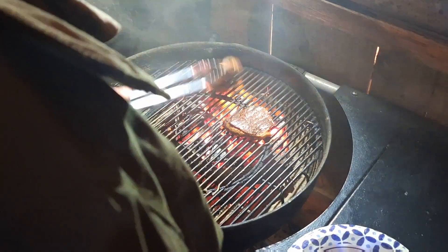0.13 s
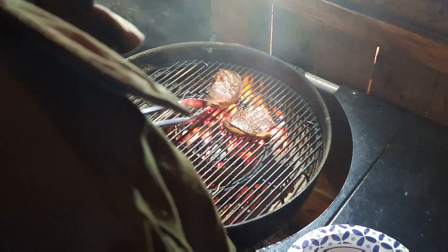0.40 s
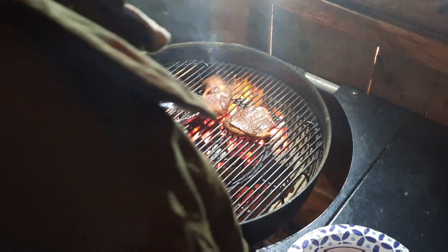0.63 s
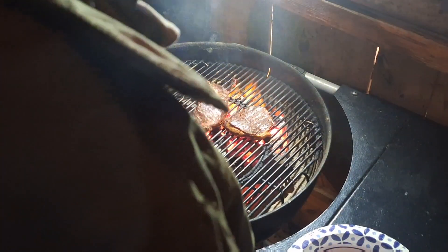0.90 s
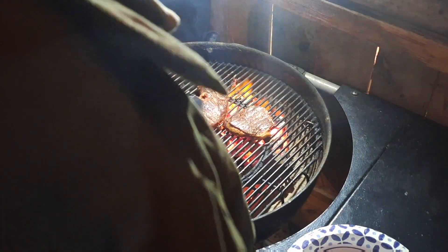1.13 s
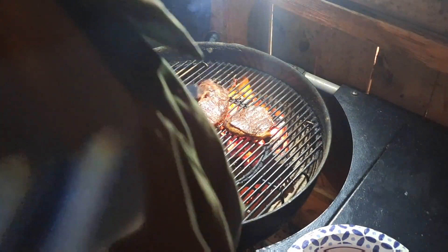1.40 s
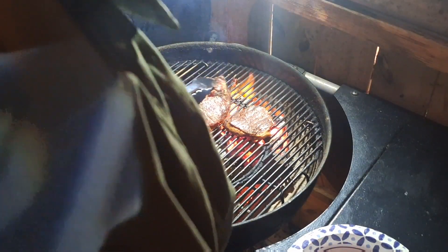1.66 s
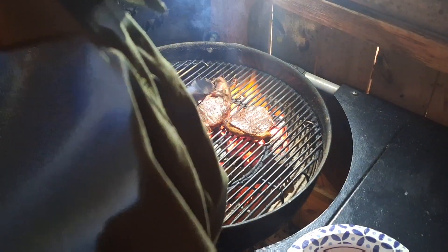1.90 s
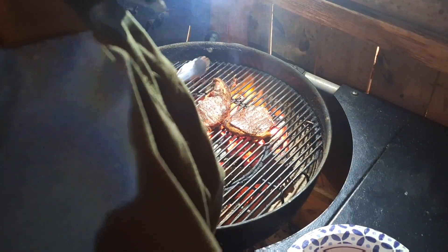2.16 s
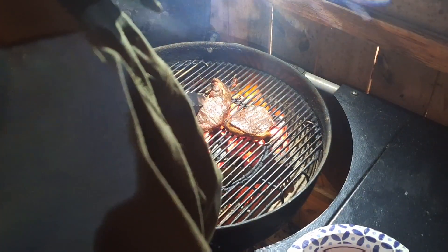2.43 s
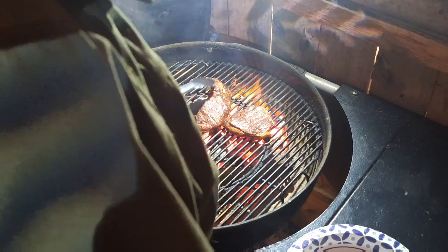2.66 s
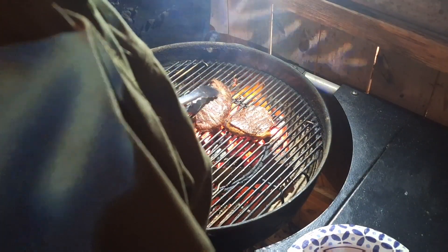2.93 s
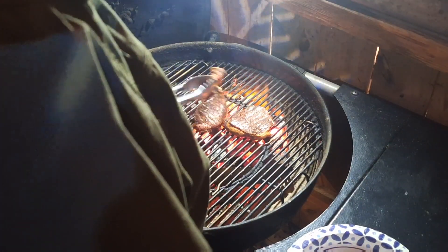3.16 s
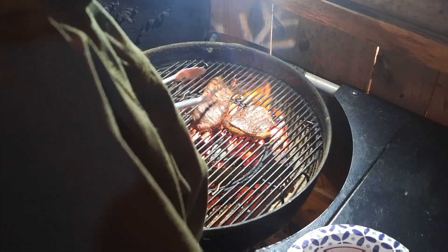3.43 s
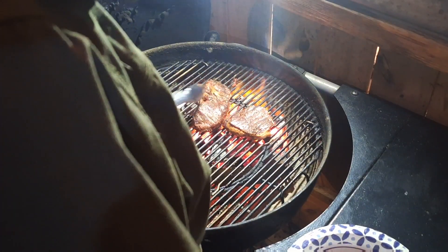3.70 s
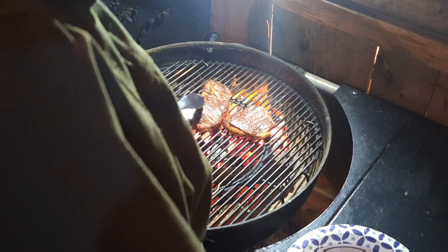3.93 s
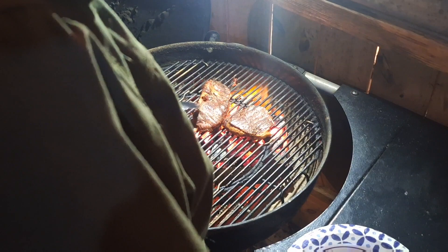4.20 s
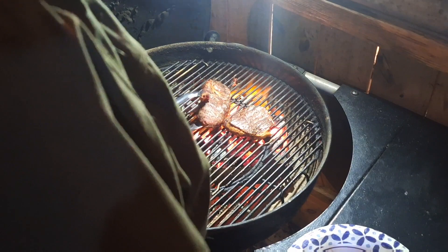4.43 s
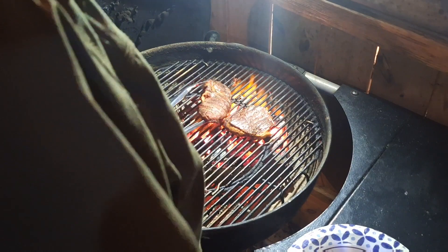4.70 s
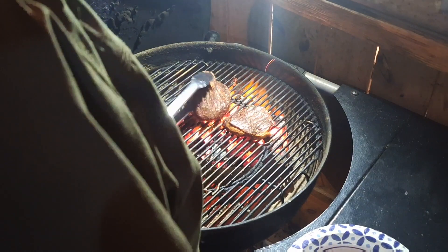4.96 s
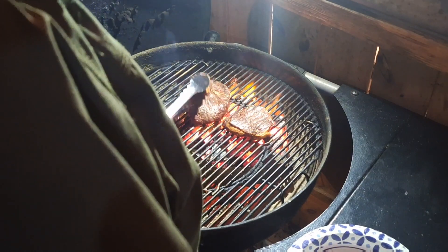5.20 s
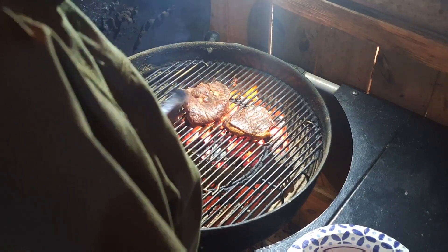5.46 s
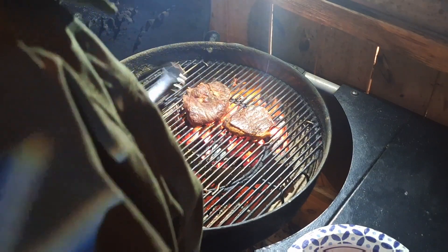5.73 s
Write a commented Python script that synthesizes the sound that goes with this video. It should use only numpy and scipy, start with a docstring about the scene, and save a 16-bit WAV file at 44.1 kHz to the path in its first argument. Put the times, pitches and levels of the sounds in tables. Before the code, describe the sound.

A wet, uneven sizzle crackles close by, its treble leaning right, broken by loud spitting pops. Tongs tap and rattle on the steel grate with short, dry ringing, and meat lands in dull thuds. Underneath, a low engine hum wavers on the left with soft rumble. The loudest snaps momentarily duck everything in the stereo pickup.

```python
"""Steaks sizzle, spit and pop on a charcoal kettle grill close to a stereo camera, brightest on the right.
Steel tongs tap and scrape the grate between wooden walls: rattling contacts ring damped steel modes.
Some way off to the left an engine idles: wavering tones make the hum and shaped noise the low rumble.
Sizzle is thousands of random bubble clicks a second; the big pops add scattered spray.
The camera's limiter ducks everything for a moment after peaks over its limit."""
import sys
import numpy as np
from scipy import signal
from scipy.fft import rfft, irfft
from scipy.io import wavfile
from scipy.ndimage import uniform_filter1d

SR = 44100
rng = np.random.default_rng(int(sys.argv[2]) if len(sys.argv) > 2 else 0)


def store_pcm(level_fs):
    """Save levels as 16-bit WAV."""
    pcm = np.round(np.clip(level_fs, -1, 1) * 32767).astype(np.int16)
    wavfile.write(sys.argv[1], SR, np.atleast_2d(pcm).T)


def decibels_to_gain(level_db):
    """Convert a level in decibels to a linear amplitude gain (20 dB per decade)."""
    exponent = np.asarray(level_db, float) / 20
    return 10 ** exponent


N = 257544

# Low wash of engine and draught. Each row: frequency in Hz, relative density in dB per Hz.
RUMBLE_SPECTRUM = [(12, -37), (20, -24), (54, 3), (123, -6), (148, -15), (177, -9), (352, -17.5),
                   (874, -36), (1510, -42), (1640, -42.5), (2500, -36.5), (3250, -108), (5500, -120)]
# Likeness of the wash at the two microphones. Each row: frequency in Hz, left-right correlation.
RUMBLE_LIKENESS = [(60, 0.96), (130, 1), (290, 0.84), (640, 0.51), (1410, 0.21), (3100, 0.96), (6820, 0.02),
                   (15000, -0.01)]
RUMBLE_RMS_DB = -30

# Slow uneven level of the low hum, from chance beating of its close lines.
# Each row: time in seconds, level in dB.
HUM_LEVEL = [(0.0, -20), (0.5, -26), (1.4, -22.5), (2.0, -26.5), (2.6, -21.5), (3.4, -23.5), (4.0, -28),
             (4.6, -24.5), (5.3, -22), (5.84, -24.5)]
# Drift of the engine's pitch. Each row: time in seconds, frequency of the hum's second-order line in Hz.
ENGINE_PITCH = [(0.0, 131.6), (0.11, 127.4), (0.81, 127.0), (1.79, 128.8), (2.42, 125.8), (3.14, 125.9),
                (4.16, 130), (5.07, 126), (5.84, 125.8)]
# Lines of the hum. Each row: multiple of half the second-order line, relative level in dB.
HUM_LINES = [(.8, -14), (1, -5), (1.2, -10.5), (1.4, -15), (1.6, -19), (1.799, -9), (2, -1.5), (2.9, -33.5)]
UPPER_HUM_DB = -27.5  # steady level of the lines above the low hum

# Ringing modes of tongs and grate. Each row: frequency in Hz, relative level in dB.
STEEL_MODES = [(210, 0), (260, -3), (370, -4), (500, 7), (590, 20), (740, 22), (860, 19), (1150, 18.5),
               (1340, 1), (1700, 6), (1860, 30), (2210, 20), (2285, 17), (2800, -7), (3150, -10),
               (3400, -1), (3770, 22.5), (4190, -3), (5030, 21.5), (5280, 20), (5750, 16), (6400, -16),
               (6810, -7), (7250, 30.5)]
RING_T60_S = .038  # at 1 kHz, falling with the root of pitch: meat and hand damp the steel
# Tongs clacking broadly on the grate.
# Each row: start in seconds, peak in dB, centre in Hz, spread in octaves, rattle decay in seconds.
CLACKS = [(0.0502, -18.5, 3040, 1.23, 0.0097), (0.832, -10.5, 4460, .55, 0.0055),
          (0.9557, -16, 3500, 1.05, 0.024), (0.992, -15.5, 3420, 0.96, 0.015),
          (1.444, -24.5, 2080, 1.06, 0.071), (1.9857, -15, 3500, 0.73, 0.0052),
          (1.9957, -15, 3500, 0.44, 0.0079), (1.5524, -19.5, 4040, 0.25, .003),
          (2.4029, -21, 3600, .52, .008), (3.8606, -9, 5500, 0.37, 0.017), (4.124, -24.5, 2060, 1.1, 0.028),
          (4.129, -18.5, 4960, 0.44, .009), (5.466, -14, 3050, 0.96, .007), (5.489, -24, 3600, 0.63, 0.018),
          (5.515, -14, 2930, 0.58, 0.013), (5.5408, -8.5, 2820, 1.08, .014),
          (5.5574, -10, 6000, 0.64, 0.011), (5.574, -31, 3600, 1.06, 0.012)]
# Light touches that ring few modes.
# Each row: start in seconds, peak in dB, centre in Hz, spread in octaves, rattle decay in seconds.
PINGS = [(0.0644, -38, 1430, 0.09, 0.016), (0.974, -35, 1270, 0.16, .015), (2.357, -28, 3800, 0.22, 0.0093),
         (3.471, -26.5, 2800, 0.14, 0.006), (3.5049, -34, 1690, .1, 0.0076),
         (3.558, -21, 3970, 0.28, 0.0031), (3.868, -23, 2290, .03, 0.034), (4.8774, -35, 2130, 0.11, .012)]
# Dull knocks of tongs and meat on the grate.
# Each row: start in seconds, peak in dB, centre in Hz, rattle decay in seconds.
THUDS = [(0.017, -32, 410, 0.031), (0.558, -29, 230, 0.045), (0.897, -31, 420, .03),
         (1.445, -29, 520, 0.045), (1.483, -26, 231, 0.084), (1.984, -25, 930, 0.0059),
         (1.995, -25, 986, 0.005), (2.644, -42.5, 700, 0.064), (3.502, -28, 463, 0.037),
         (3.508, -25, 217, 0.032), (3.865, -31, 895, 0.048), (4.143, -39, 601, 0.052),
         (4.881, -33.5, 503, 0.056), (5.508, -29.5, 700, 0.064)]
THUD_OCTAVES = .35
CLACK_CRACK_DB, PING_CRACK_DB, THUD_CRACK_DB = 7, -1, 6  # unpitched contact noise against the ringing
TONGS_LEFT_DB, MEAT_LEFT_DB = -1.5, 1.5  # left minus right

# Frying fat.
# Each row: time in seconds, level above 9 kHz in dB, gain of the wet sputter below SPUTTER_HZ in dB.
SIZZLE = [(0.0, -23.5, 9.5), (0.11, -33, 1), (0.32, -27.5, -4), (0.62, -27.5, 0), (0.75, -24, -0.5),
          (1.04, -28, 1), (1.52, -25.5, 3.5), (1.9, -25.5, 3.5), (2.21, -31, -0.5), (2.52, -26.5, 4),
          (2.91, -26, 0), (3.21, -28, 7), (3.42, -24.5, 3), (3.62, -29.5, -0.5), (4.0, -32.5, 5),
          (4.15, -28.5, 3), (4.37, -33.5, 3), (4.5, -28.5, 7), (4.8, -30.5, -1.5), (4.88, -26.5, 2),
          (5.13, -31.5, -3), (5.21, -26, -.5), (5.54, -24, 2.5), (5.84, -28, 3.5)]
# Bursting bubbles as the microphones colour them. Each row: frequency in Hz, relative density in dB per Hz.
FIZZ_COLOUR = [(350, -44), (600, -18), (739, -23.5), (860, -28), (1020, -25), (1180, -24.5), (2240, -14.5),
               (5010, -7.5), (5670, -8), (7380, -2), (9220, -10), (11800, -2), (14800, 1), (15800, 7),
               (16500, -67)]
# Lean of the grill between the microphones. Each row: frequency in Hz, left minus right in dB.
GRILL_LEAN = [(60, 0), (130, 2), (500, 3), (1500, 0.5), (2600, -1.7), (3600, -7.5), (4200, -1.5),
              (7600, 0.7), (8700, -4), (10300, -10.5), (12400, -11), (14400, -12), (16000, -7.5)]
# Big drops of fat exploding.
# Each row: start in seconds, nominal peak in dB, gain of the low body in dB, t60 of the spray in seconds.
BIG_POPS = [(0.0512, -13, -7, .04), (0.1356, -5.5, -6, .058), (0.9542, -0.5, -1, .025),
            (1.9197, -8, 1, .02), (2.0604, -5, -2, 0.021), (2.166, -8, -5, .038), (2.237, -10.5, -11, .03),
            (2.3, -13, 3, .03), (2.4146, -4, 0, 0.034), (3.1826, -1.5, -5, 0.0065),
            (3.2975, -7.5, 7, 0.031), (3.8606, 1.5, -19, .086), (4.0741, -8, -2, .03),
            (4.1914, -13, 1, .03), (4.3116, -11, -4, 0.014), (4.4555, -7, 2, 0.038),
            (4.6149, -6.5, 4, 0.021), (5.2104, -7, 5, .03), (5.4664, -5.5, -4, 0.05),
            (5.5418, -2, -2, 0.059), (5.6504, -10.5, 7, .035), (5.784, -5.5, -4, 0.039)]
SPUTTER_HZ = 3500  # sputter and pop body are turned up or down below this
BUBBLES_PER_S, SIZE_SPREAD_DB = 9000, 2
# Small dry pops at random times: each is louder than the least by up to the spread.
SMALL_POPS, SMALL_POP_DB, SMALL_SPREAD_DB = 40, -15, 7
SMALL_BODY_DB, SMALL_SPRAY_T60_S = -4, .015

LIMIT_DB, RECOVERY_DB_PER_S, ATTACK_S = -1.5, 74, 0.0046
CEILING_DB = -2.5
EDGE_HZ = 15900


def evened(x):
    """Scales to rms 1."""
    return x / np.sqrt(np.mean(x ** 2) + 1e-20)


def read(points, hz):
    """Reads a spectrum on a log-frequency axis."""
    f, value = np.transpose(points)
    return np.interp(np.log(hz + 1), np.log(f + 1), value)


def curves(rows):
    """Each column of a table after the time as one value per sample."""
    s, *columns = np.transpose(rows)
    return [np.interp(np.arange(N) / SR, s, c) for c in columns]


def sides(hz):
    """Left and right microphone gains that make the grill's lean between the channels."""
    return decibels_to_gain(np.outer([.5, -.5], read(GRILL_LEAN, hz)))


def causal(gain):
    """Minimum-phase impulse response for a gain curve."""
    mirrored = np.concatenate([gain, gain[..., -2:0:-1]], -1)
    log_gain = np.log(mirrored + 1e-5)
    response = np.fft.ifft(np.exp(np.conj(signal.hilbert(log_gain)))).real
    return response[..., :1024]


def add(mix, s, sound):
    """Mixes a two-channel sound in at time s."""
    part = mix[:, round(s * SR):][:, :sound.shape[1]]
    part += sound[:, :part.shape[1]]


def rumble():
    """Low wash of the engine and the fire's draught: patchy noise, most alike at both microphones in the bass."""
    frames, hz = N // 512 + 5, np.fft.rfftfreq(2048, 1 / SR)
    a, b, c, d, patches = rng.standard_normal((frames, 1025, 5)).T
    patches = evened(uniform_filter1d(uniform_filter1d(patches, 12, 0), 6, 1))
    same = np.clip(read(RUMBLE_LIKENESS, hz), -1, 1)[:, None]
    left, unrelated = a + 1j * b, c + 1j * d
    right = same * left + np.sqrt(1 - same ** 2) * unrelated
    shape = decibels_to_gain(read(RUMBLE_SPECTRUM, hz)[:, None] + 1.18 * patches)
    spectra = np.array([left, right]) * shape * sides(hz)[..., None]
    wash = signal.istft(spectra, nperseg=2048, noverlap=1536)[1][:, :N]
    return decibels_to_gain(RUMBLE_RMS_DB) * evened(wash)


def engine():
    """Uneven firing gives wavering lines on a comb of shaft orders; the low hum's level is slowly uneven."""
    (low_db,), (line_hz,) = curves(HUM_LEVEL), curves(ENGINE_PITCH)
    turns = np.cumsum(line_hz / 2) / SR
    hum = 0
    for order, db in HUM_LINES:
        level_db = low_db if order < 1.7 else UPPER_HUM_DB
        depth = .25 if order % 1 == 0 else .8  # whole orders are steadier
        waver = 1 + depth * evened(uniform_filter1d(rng.standard_normal(N), 4000))
        tone = np.sqrt(2) * np.cos(2 * np.pi * (order * turns + rng.random()))
        hum = hum + decibels_to_gain(db + level_db) * waver * tone
    later = np.roll(hum, 25)
    return np.array([hum, later]) * decibels_to_gain([[1.2], [-1.2]])  # louder and sooner on the left


def blows():
    """Every contact with the steel as time, level, centre, spread, rattle, contact noise and side."""
    return ([(*row, CLACK_CRACK_DB, TONGS_LEFT_DB) for row in CLACKS]
            + [(*row, PING_CRACK_DB, TONGS_LEFT_DB) for row in PINGS]
            + [(s, db, hz, THUD_OCTAVES, rattle, THUD_CRACK_DB, MEAT_LEFT_DB) for s, db, hz, rattle in THUDS])


def tongs():
    """Each blow is a dying rattle of contacts; its centre and spread pick the steel modes that ring."""
    out, t, hz = np.zeros((2, N)), np.arange(16384) / SR, np.fft.rfftfreq(16384, 1 / SR)
    modes_hz, modes_db = np.transpose(STEEL_MODES)[..., None]
    decay_db = 60 * t * np.sqrt(modes_hz / 1000) / RING_T60_S
    rings = decibels_to_gain(modes_db - decay_db) * np.sin(2 * np.pi * modes_hz * t)
    walls = decibels_to_gain(-24.0 - 60 * t / 0.13) * (t > .004)  # the wooden corner answers each blow
    for s, db, centre_hz, octaves, rattle_s, crack_db, left_db in blows():

        def near(f):
            """Bell curve around the blow's centre on an octave scale."""
            return np.exp(-.5 * (np.log2((f + 1) / centre_hz) / max(octaves, .03)) ** 2)

        struck = rng.random(len(t)) < .06
        contacts = rng.standard_normal(len(t)) * struck * np.exp(-t / abs(rattle_s))
        contacts[0] = 0.87
        # each microphone hears each mode differently
        shapes = near(modes_hz.T) * decibels_to_gain(2.0 * rng.standard_normal((2, len(STEEL_MODES))))
        crack = causal(near(hz) * np.sqrt(centre_hz / (hz + centre_hz / 4)))
        crack = np.pad(crack, (0, len(t) - 1024))
        steel = evened(shapes @ rings) + decibels_to_gain(crack_db) * evened(crack)
        echo = walls * rng.standard_normal((2, len(t)))
        blow = irfft(rfft(contacts) * rfft(steel) * (1 + rfft(echo)))[:, :12000]
        pan_db = np.array([[.5], [-.5]]) * left_db
        add(out, s, blow / abs(blow.mean(0)).max() * decibels_to_gain(db + pan_db))
    return out


def bowl(echo_db, t60s):
    """For each spot on the grate: its own arrival time at each microphone, then a short dying scatter."""
    t, count = np.arange(3000) / SR, len(t60s)
    fade = decibels_to_gain(echo_db - 60 * t / np.abs(t60s)[:, None, None])
    paths = fade * rng.standard_normal((count, 2, len(t)))
    paths[..., :60] = 0
    arrivals = rng.integers(40, 48, (count, 2)) + [0, 2]
    paths[np.arange(count)[:, None], [0, 1], arrivals] = 1
    return paths


def pops():
    """The large pops and a random scatter of small dry ones, as columns of time, size, body and spray t60."""
    when, size = rng.random((SMALL_POPS, 2)).T
    alike = np.ones(SMALL_POPS)
    small_db = SMALL_POP_DB + SMALL_SPREAD_DB * size
    small = [when * N / SR, small_db, SMALL_BODY_DB * alike, SMALL_SPRAY_T60_S * alike]
    return np.vstack([BIG_POPS, np.transpose(small)]).T


def fat():
    """Steam bubbles burst all over the meat, a few much larger; the big pops spray droplets after them."""
    level_db, sputter_db = curves(SIZZLE)
    hz = np.fft.rfftfreq(4096, 1 / SR)
    colour = causal(decibels_to_gain(read(FIZZ_COLOUR, hz)) * sides(hz))
    flurries_db = 1.0 * evened(uniform_filter1d(rng.standard_normal(N), 500))
    size = decibels_to_gain(SIZE_SPREAD_DB * np.minimum(rng.exponential(1, N), 6) + flurries_db)
    bursts = size * rng.choice([-1., 1.], N) * (rng.random(N) < BUBBLES_PER_S / SR)
    spot = rng.integers(0, 10, N)  # which of ten spots on the grate each bubble bursts at
    fizz = np.zeros((2, N))
    for k, path in enumerate(bowl(echo_db=-16.0, t60s=np.full(10, .04))):
        fizz += signal.oaconvolve((bursts * (spot == k))[None], path, axes=1)[:, :N]
    # level is set on the coloured treble of both microphones together
    top = signal.butter(6, 9000, "high", fs=SR, output="sos")
    fizz /= signal.sosfilt(top, signal.oaconvolve(fizz, colour, axes=1).mean(0)).std()
    low = signal.butter(2, SPUTTER_HZ, fs=SR, output="sos")
    fizz = decibels_to_gain(level_db) * (fizz + (decibels_to_gain(sputter_db) - 1) * signal.sosfilt(low, fizz))
    *rows, sprays = pops()
    paths = bowl(echo_db=-20, t60s=sprays) / abs(colour.mean(0)).max()
    for s, db, body_db, path in zip(*rows, paths):
        body = (decibels_to_gain(body_db) - 1) * signal.sosfilt(low, path)
        add(fizz, s, decibels_to_gain(db) * (path + body))
    return signal.oaconvolve(fizz, colour, axes=1)[:, :N]


def scene():
    """All sources at the two microphones."""
    return rumble() + engine() + tongs() + fat()


def low_pass(x):
    """Removes everything above the highest recorded frequency."""
    return signal.sosfilt(signal.butter(12, 17040, fs=SR, output="sos"), x)


def record(dry):
    """Peaks over the limit turn both channels down a few milliseconds late, so the peak itself is squeezed
    at the ceiling and a dip follows; then the treble is cut off at the band edge."""
    peak_db = 20 * np.log10(abs(dry).max(0) + 1e-9)
    fall = np.arange(N) * RECOVERY_DB_PER_S / SR
    held_db = np.maximum.accumulate(peak_db + fall) - fall  # peaks held, then released at a steady rate
    over_db = np.maximum(held_db - LIMIT_DB, 0)
    lag = np.exp(-1 / (ATTACK_S * SR))
    ducked = dry / decibels_to_gain(signal.lfilter([1 - lag], [1, -lag], over_db))
    squeezed = ducked / (1 + (ducked / decibels_to_gain(CEILING_DB)) ** 8) ** (1 / 8)
    edge = signal.firwin(255, EDGE_HZ, window=("kaiser", 6), fs=SR)
    finished = signal.oaconvolve(squeezed, edge[None], "same", axes=1)
    return low_pass(finished)


dry = scene()
out = record(dry)
store_pcm(out)
```